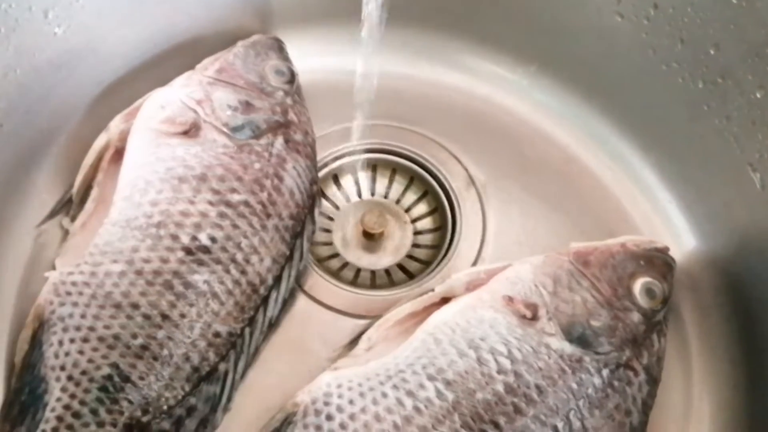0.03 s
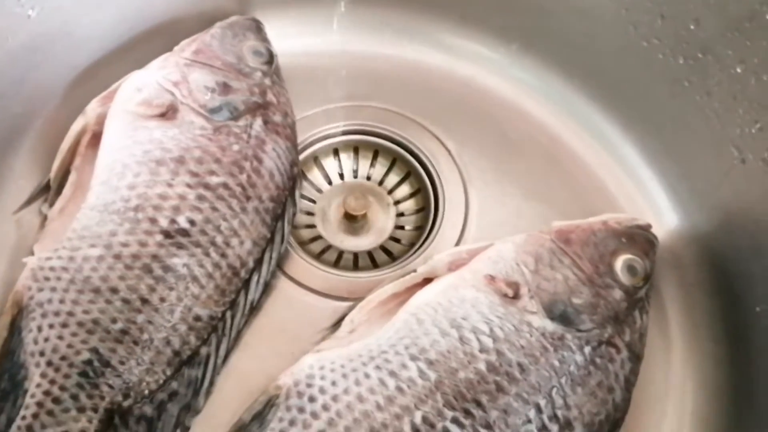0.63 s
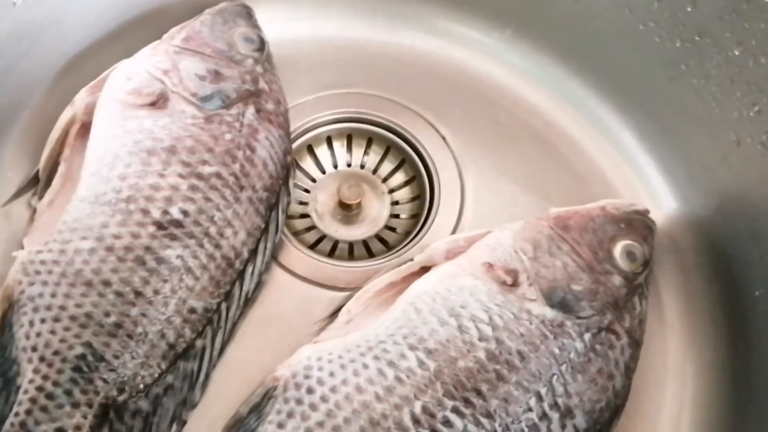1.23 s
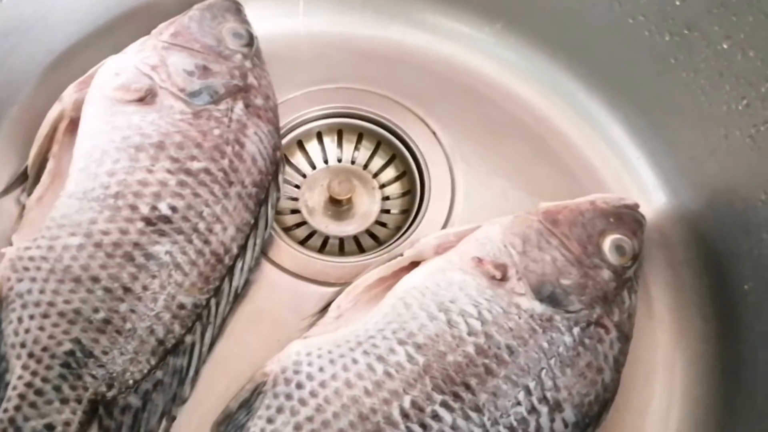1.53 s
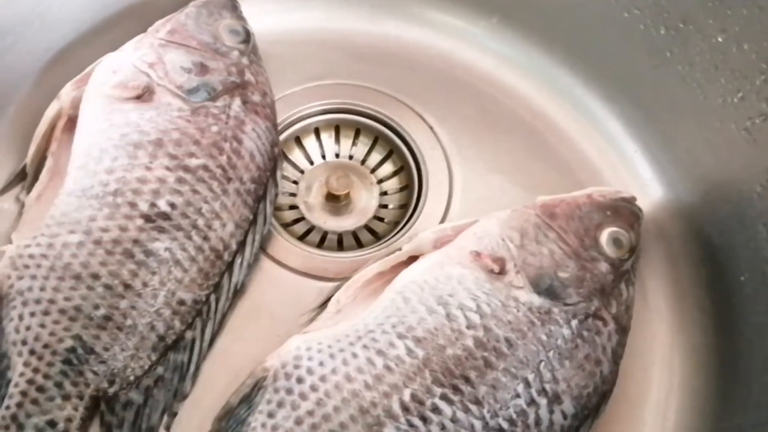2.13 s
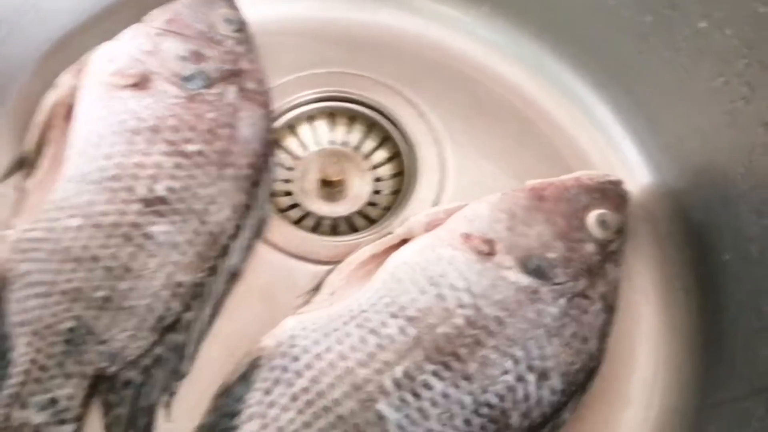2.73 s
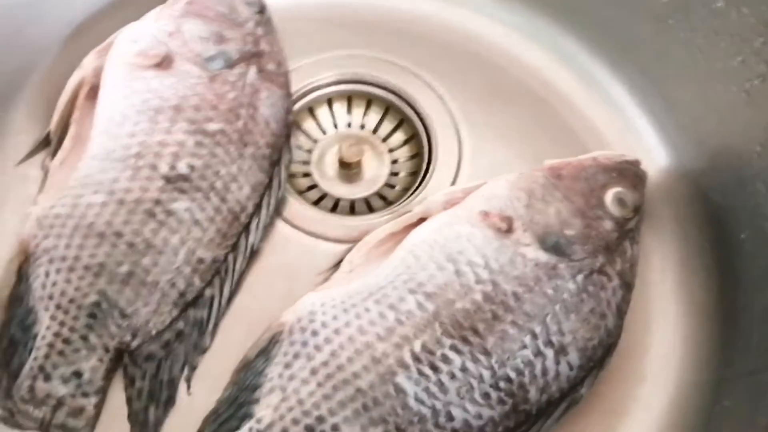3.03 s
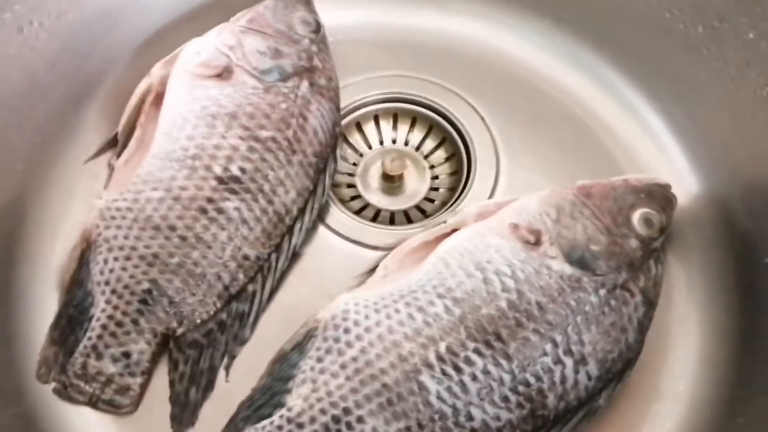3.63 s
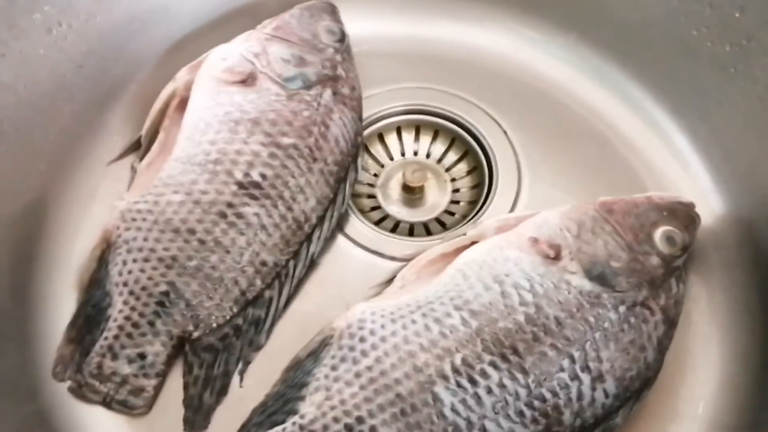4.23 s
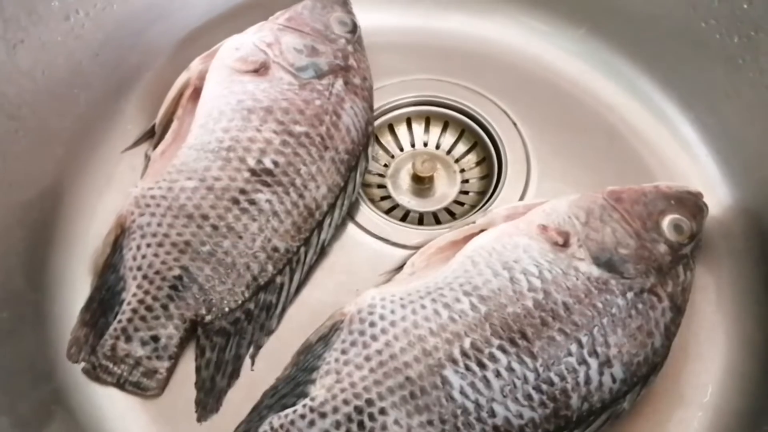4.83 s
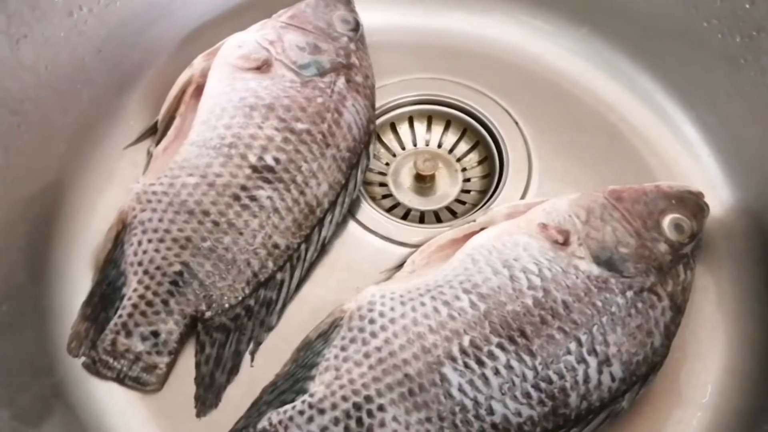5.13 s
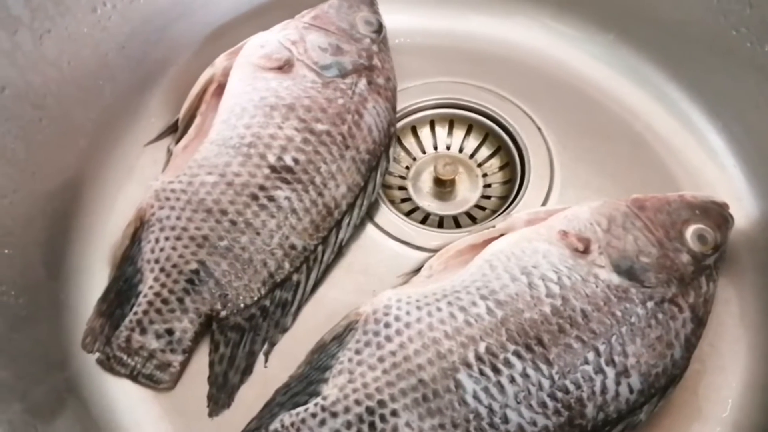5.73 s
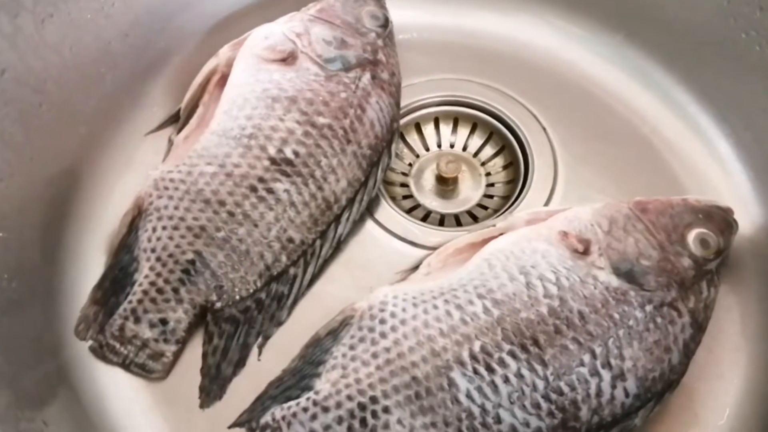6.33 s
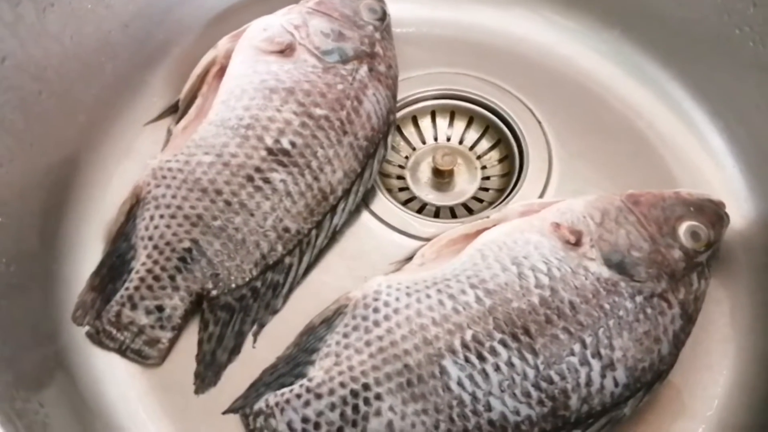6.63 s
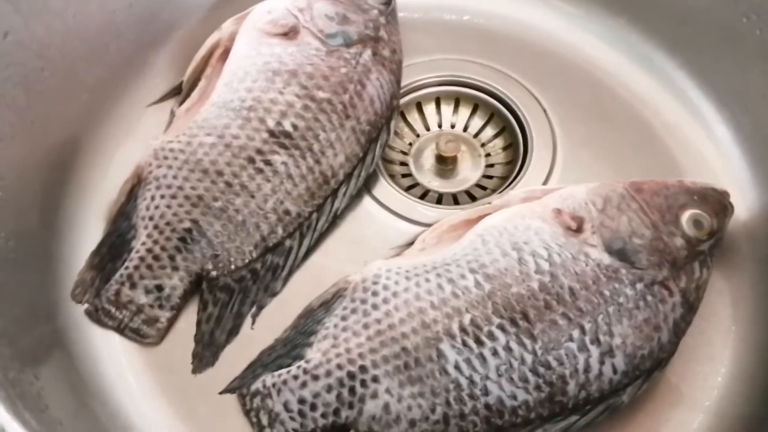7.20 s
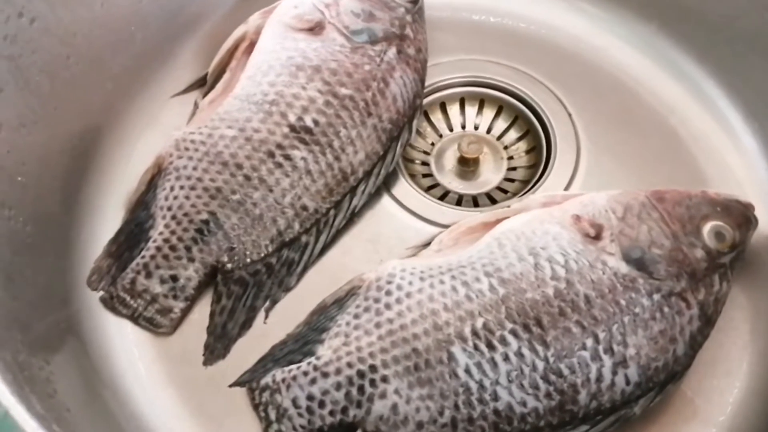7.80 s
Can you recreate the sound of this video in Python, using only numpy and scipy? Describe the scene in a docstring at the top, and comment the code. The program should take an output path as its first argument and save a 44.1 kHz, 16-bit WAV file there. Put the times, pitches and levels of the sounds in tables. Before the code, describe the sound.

A thin stream from a tap splatters on a steel kitchen sink and dies away after about a second. The remaining water then goes down the drain with quick, hollow gulps that ring in the waste pipe, while tiny bubbles fizz and ping at the strainer. The gurgling gradually thins into separate pops and drips. It is heard very close to the drain, with a slight kitchen echo and a faint electrical hum.

```python
"""Last water down the kitchen sink

Close on a steel sink, two microphones at the drain. The tap is shut off and its stream dies on the steel.
As the last water runs out, air gulps through it and rings the waste pipe, while small bubbles ping and
burst at the strainer slots. The gurgle thins to drips; basin and kitchen echo over a faint mains hum."""
import sys
import numpy as np
from scipy import signal
from scipy.fft import rfft, irfft
from scipy.io import wavfile

SR = 44100
rng = np.random.default_rng(int(sys.argv[2]) if len(sys.argv) > 2 else 0)


def transcribe(signal):
    """Save signal, clipped to [-1, 1], as a 16-bit WAV file at the path in sys.argv[1]."""
    frames = np.atleast_2d(signal).T
    limited = np.clip(frames, -1, 1)
    pcm = np.round(limited * 32767).astype(np.int16)
    wavfile.write(sys.argv[1], SR, pcm)


N = 351036

# kitchen reverberation: (frequency [Hz], t60 [s])
KITCHEN_DECAY = [(200, 0.15), (700, 0.31), (1800, 0.24), (5000, 0.21), (12000, 0.044)]
# reflections inside the steel basin: (frequency [Hz], t60 [s])
BASIN_DECAY = [(300, 0.021), (8000, 0.0093)]
# the drain at the two microphones: (frequency [Hz], left minus right [dB], left lead [rad])
MIC_PAIR = [(186, -3, 0), (304, 1, 0.94), (515, 1.5, -0.15), (800, -3, 1.15), (1007, -5.5, 1.58),
            (1340, -6.5, 2), (1430, -14, 1.33), (2150, -12.5, 3), (2917, 1.5, 2.5), (4260, -21, -1.5),
            (4300, -3, -1.5), (5720, -14.5, -1.52), (8260, 20, -1.1), (11100, 7, -1.65), (15000, -6, -2)]
# air resonances of the waste pipe: (frequency [Hz], gain [dB], t60 [s])
PIPE_MODES = [(197.2, 6.5, 0.2), (279.2, 1, 0.24), (352.3, -5, 0.25), (672, -5, 0.071), (1067, -3.5, 0.22),
              (1262, -6, 0.046), (1543, 2.5, 0.031), (3138, -1.5, 0.026)]
# room tone: (frequency [Hz], gain [dB])
ROOM_SPECTRUM = [(20, -12.5), (88, 9), (150, -7.5), (250, -11.5), (380, -8), (800, -17), (1100, -34),
                 (1800, -25.5), (3200, -28.5), (4000, -31), (5800, -25.5), (7500, -32), (15500, -33)]
# mains hum: (frequency [Hz], level [dB])
HUM_TONES = [(67, -84), (100, -68), (196, -77)]
# water rumbling down in the waste pipe: (time [s], level [dB])
RUMBLE_LEVEL = [(0, -51), (0.4, -52), (1.1, -57), (1.6, -58.5), (2.2, -55.5), (4.2, -50), (5.5, -59),
                (7.96, -82)]
# that rumble's tone: (frequency [Hz], gain [dB])
RUMBLE_SPECTRUM = [(55, -37), (82, -13.5), (100, 7.5), (118, -10.5), (150, -16), (195, -9), (250, -31.5)]
# the tap's dying jet: (time [s], level [dB])
JET_LEVEL = [(0, -49), (.1, -51.5), (.2, -59.5), (.4, -57.5), (.52, -57.5), (.555, -53), (.64, -59),
             (.75, -57.5), (1, -64), (1.25, -55)]
# the jet on the steel: (frequency [Hz], gain [dB])
JET_SPECTRUM = [(160, -17), (270, 6), (480, -7.5), (800, -3), (1150, -9.5), (1550, -4.5), (2400, -10.5),
                (3200, -2), (4000, -17), (5700, -9.5), (9000, -8.5), (15500, -40)]
# the jet's fine spray: (frequency [Hz], gain [dB])
SPRAY_SPECTRUM = [(5000, 7), (8000, -2), (15500, -6)]
# the stream spurting into the puddle: (time [s], level [dB])
SPURT_LEVEL = [(0, -67), (.085, -46), (.13, -71), (.5, -67.5), (.55, -58), (.64, -60.5), (.75, -67),
               (1.1, -74)]
# the trickle between gulps: (time [s], churn level [dB], fizz level [dB])
TRICKLE_LEVELS = [(1.1, -57.5, -61), (2.04, -52.5, -53.5), (2.49, -52, -52.5), (2.96, -48, -48.5),
                  (3.27, -54.5, -51.5), (3.75, -55, -56.5), (4.05, -51.5, -54.5), (4.85, -55, -58),
                  (5.15, -59.5, -59), (5.5, -52, -62), (5.99, -64.5, -57.5), (6.29, -70, -60.5),
                  (6.6, -67.5, -60), (7.6, -72, -67)]
# water churning in the pipe: (frequency [Hz], gain [dB])
CHURN_SPECTRUM = [(140, -18.5), (194, -1), (243, -13.5), (355, 1), (520, -8), (680, -20), (880, -23),
                  (1075, -5), (1200, -34), (1530, -14), (1720, -29), (2000, -22), (2450, -21)]
# fizz at the slots: (frequency [Hz], gain [dB])
FIZZ_SPECTRUM = [(2400, -24), (2800, -5), (3150, -7.5), (4000, -27.5), (5150, -7.5), (5900, 4), (7100, -30),
                 (8300, -13), (10500, -21), (11700, -13.5), (13000, -22), (15200, -14)]
# crackling foam: (frequency [Hz], gain [dB])
FROTH_SPECTRUM = [(2500, -11), (2900, 0.5), (3500, 2), (4050, -7.5), (4500, -7.5), (5150, 1.5),
                  (5500, -3.5), (5850, -5.5), (6400, -7.5), (7100, -24), (8200, 1), (9200, -12),
                  (15000, -18)]
# drops landing on bare steel: (time [s], level [dB])
STEEL_DROPS = [(0.137, -38), (0.153, -34.5), (0.27, -41), (0.305, -48), (0.354, -40), (0.424, -36.5),
               (0.461, -45), (0.659, -41.5), (0.805, -51), (0.939, -49.5), (1.181, -39), (1.217, -42.5),
               (4.053, -39), (4.145, -43.5), (4.336, -58), (4.776, -39), (4.866, -50), (6.8912, -29.5)]
# their spray: (frequency [Hz], gain [dB])
SPLAT_SPECTRUM = [(6000, 4.5), (9500, 5), (11700, 5), (13500, -11), (14800, 1), (15700, -22)]
# large bubbles surfacing: (time [s], length [s], start pitch [Hz], end pitch [Hz], level [dB])
LARGE_BUBBLES = [(0.895, 0.04, 175, 208, -55.5), (1.122, 0.051, 175, 224, -54),
                 (1.233, 0.029, 248, 252, -52), (1.313, 0.022, 271, 282, -41),
                 (1.38, 0.029, 308, 280, -37.5), (1.454, 0.026, 329, 273, -46),
                 (1.497, 0.039, 300, 342, -44.5), (1.657, 0.052, 356, 342, -45),
                 (1.927, 0.073, 348, 369, -35.5), (2.069, 0.1, 365, 344, -42.5),
                 (2.187, 0.026, 365, 362, -33.5), (2.546, 0.071, 350, 339, -39),
                 (2.943, 0.08, 345.4, 364, -51), (2.981, 0.041, 360, 350, -42),
                 (3.997, 0.025, 930, 1390, -44.5), (4.033, 0.0212, 1115, 1680, -40),
                 (4.338, 0.018, 1170, 1570, -47), (4.459, 0.022, 1310, 1830, -44.5),
                 (4.562, 0.024, 1770, 1360, -48.5), (4.59, 0.021, 1073, 1160, -38),
                 (5.729, 0.026, 1290, 1600, -65)]
# loud drops and small bubbles round the strainer: (time [s], pitch [Hz], ring level [dB], burst level [dB])
LOUD_PINGS = [(0.011, 1502, -52, -51.5), (0.076, 865, -51, -44), (0.092, 1520, -57, -44.5),
              (0.136, 5940, -42, -44.5), (0.153, 5800, -39.5, -45), (0.267, 8450, -48, -51),
              (0.353, 6800, -43, -49), (0.424, 5680, -60, -53), (0.497, 5670, -50.5, -55),
              (0.549, 1554, -54, -58), (0.563, 833, -54.5, -55), (0.613, 5254, -51, -60),
              (0.804, 6370, -58, -52), (0.863, 5750, -44.5, -76), (1.096, 3430, -53.5, -59),
              (1.216, 3350, -58, -52), (1.781, 5040, -49, -50.5), (1.849, 5040, -48, -55),
              (1.919, 4900, -51, -55), (1.995, 5740, -47, -56), (2.037, 5770, -46.5, -77),
              (2.095, 5470, -41.5, -63), (2.136, 5800, -43, -49), (2.253, 5660, -56, -62),
              (2.348, 4480, -50, -52), (2.411, 5870, -37.5, -57), (2.445, 5730, -45, -50.5),
              (2.508, 5100, -45, -46.5), (2.562, 5330, -50, -54), (2.741, 5850, -50, -53),
              (2.866, 5570, -43.5, -44.5), (3.013, 3180, -46.5, -63), (3.066, 5150, -46, -47),
              (3.172, 5160, -46, -66), (3.276, 4920, -41.5, -49), (3.329, 3060, -46.5, -54),
              (3.366, 3080, -53, -47), (3.38, 3116, -42, -60), (3.533, 5130, -40.5, -51.5),
              (3.698, 3236, -46, -51.5), (3.872, 5350, -48, -71.5), (3.996, 5090, -42.5, -60),
              (4.054, 5670, -41.5, -46), (4.199, 3165, -48.5, -45), (4.279, 3200, -39.5, -41.5),
              (4.338, 6100, -47, -75), (4.489, 3090, -48, -78), (4.619, 3040, -44.5, -57),
              (4.664, 3175, -41.5, -44), (4.776, 3275, -46, -55), (4.83, 3210, -47, -54),
              (4.866, 5960, -48, -49), (4.925, 4540, -44.5, -54), (5.036, 8930, -56, -52),
              (5.195, 3230, -43, -60), (5.408, 3250, -47, -59), (5.436, 3210, -47.5, -77.5),
              (5.492, 3150, -53.5, -58), (5.521, 8870, -44.5, -54), (5.668, 3234, -45, -58),
              (5.887, 3250, -53, -69), (5.951, 3170, -47, -64), (6.107, 5090, -48, -48),
              (6.307, 3160, -54.5, -51.5), (6.49, 4820, -42, -56), (6.533, 8990, -54, -42.5),
              (6.568, 6180, -48, -39.5), (6.601, 3170, -48, -52), (6.705, 8470, -55, -58),
              (6.763, 3230, -57.5, -55.5), (6.827, 5100, -53, -55.5), (6.892, 9400, -41.5, -52),
              (6.985, 4600, -49, -52), (7.182, 3210, -53.5, -55.5), (7.215, 8270, -51, -63),
              (7.239, 5870, -60, -42), (7.279, 5590, -54, -45.5), (7.343, 6650, -50, -56),
              (7.382, 3210, -55, -54), (7.522, 3310, -49, -67), (7.669, 8740, -54, -49.5),
              (7.719, 6120, -37.5, -65), (7.778, 3260, -52.5, -51), (7.859, 8260, -46.5, -56),
              (7.891, 3200, -53, -51.5)]
# notes of the bubble sizes the strainer favours: (pitch [Hz])
SLOT_NOTES = [3255, 5220, 8640]
# a small bubble bursting: (frequency [Hz], gain [dB])
BURST_SPECTRUM = [(1200, -14), (2500, -9), (3200, -0.5), (4000, -3), (5200, 4.5), (6000, 10.5),
                  (7200, -10.5), (8600, 5.5), (10300, -9.5), (11700, -12), (13200, -25), (15500, -10)]
# loud air gulps in the drain: (time [s], low ring level [dB], pop pitch [Hz], pop level [dB])
LOUD_GULPS = [(1.315, -45, 1020, -49.5), (1.368, -41.5, 1050, -52.5), (1.575, -48.5, 1045, -54.5),
              (1.681, -52, 1020, -54), (1.752, -54, 1070, -54), (1.782, -43, 1087, -46.5),
              (1.921, -41.5, 1060, -43.5), (1.962, -37, 1080, -43), (2.017, -37, 1084, -47),
              (2.059, -33.5, 1060, -52), (2.077, -34, 1068, -48), (2.161, -34.5, 1096, -40.5),
              (2.201, -39.5, 1130, -52), (2.346, -52, 1054, -53), (2.364, -50, 1048, -41.5),
              (2.394, -44, 1044, -48), (2.447, -54, 1040, -70), (2.477, -39.5, 1086, -49),
              (2.528, -33.5, 1099, -34.5), (2.564, -44, 990, -50), (2.61, -44, 1030, -49),
              (2.702, -42.5, 1050, -42), (2.768, -45.5, 1040, -41.5), (2.787, -45.5, 1060, -55),
              (2.887, -43, 1000, -63), (2.926, -37, 1070, -69), (2.965, -41, 1020, -47),
              (3.014, -53, 1060, -42.5), (3.048, -45, 1095, -47), (3.096, -46, 1070, -46),
              (3.112, -43, 1050, -44.5), (3.17, -36, 1072, -36), (3.229, -57, 1070, -48),
              (3.425, -49.5, 1083, -41), (3.475, -39.5, 1083, -38), (3.698, -36.5, 1050, -54),
              (3.834, -44.5, 1083, -46), (3.947, -49, 1040, -72), (3.996, -44.5, 1073, -57),
              (4.027, -42.5, 1084, -62), (4.111, -41.5, 1040, -64), (4.038, -43.5, 1314, -58),
              (4.165, -47.5, 1224, -38.5), (4.241, -37.5, 1010, -41), (4.253, -43.5, 1205, -56),
              (4.277, -65, 2130, -44), (4.397, -35.5, 1080, -39), (4.413, -44, 1200, -57),
              (4.443, -48, 1046, -37.5), (4.464, -59, 1073, -38), (4.513, -43, 1050, -47),
              (4.536, -40.5, 1036, -44), (4.59, -46, 1114, -42), (4.686, -61, 1140, -46),
              (4.716, -52, 1207, -44), (4.775, -52, 1140, -51), (4.829, -44.5, 1090, -54),
              (4.871, -51, 1100, -57), (4.903, -43.5, 1044, -67), (4.925, -44, 1205, -44.5),
              (4.97, -40.5, 1057, -45), (5.014, -50, 1067, -54), (5.065, -66, 1077, -55.5),
              (5.166, -56, 910, -56), (5.238, -39.5, 1310, -45.5), (5.262, -46, 1100, -59),
              (5.312, -47.5, 1030, -48.5), (5.401, -36, 1064, -40.5), (5.426, -44.5, 1070, -48),
              (5.522, -44.5, 1080, -34), (5.597, -50, 1070, -52), (5.612, -46, 1600, -57.5),
              (5.666, -59, 1315, -49.5), (5.725, -45, 1470, -48), (5.808, -48.5, 1970, -53),
              (5.951, -41.5, 1020, -45), (6.222, -44.5, 1786, -47), (6.305, -55, 2116, -50.5),
              (6.51, -55.5, 1050, -61), (6.523, -49, 1290, -55), (6.568, -49, 2030, -41),
              (6.602, -50.5, 1120, -60), (6.704, -41, 1168, -41.5), (6.892, -58.5, 1030, -53.5),
              (7.181, -51, 1110, -63), (7.239, -47.5, 1090, -50), (7.277, -52.5, 1330, -62),
              (7.381, -51, 1090, -57.5), (7.67, -53, 1094, -52.5), (7.777, -54, 2145, -56)]
# a gulp's thump: (frequency [Hz], gain [dB])
THUMP_SPECTRUM = [(90, -32.5), (190, -8.5), (245, -27), (350, -7.5), (480, -1.5), (700, -5), (880, -13.5),
                  (1300, -45.5)]
# a gulp's pop: (frequency [Hz], gain [dB])
POP_SPECTRUM = [(500, -18.5), (850, -8), (1080, 2.5), (1300, -1.5), (1550, -6), (1720, -14.5), (1900, 1.5),
                (2100, 4), (2350, -41), (3000, -4.5)]

UNCOVER_S = 1.1  # air first breaks through the drain
LEVEL_SPAN_S = 0.015  # time over which a short sound's loudness is averaged
EDGE_HZ = 15900  # top of the recorder's band
TIME, FREQS = np.arange(N) / SR, np.fft.rfftfreq(N, 1 / SR)
AGE = TIME[:SR // 8]  # time within one short sound


def amp(db):
    """Decibels to gain."""
    return 10 ** (np.asarray(db) / 20)


def decay(t, t60):
    """A fall of 60 dB every t60 seconds."""
    return np.exp(-np.log(1000) * t / t60)


def unit_rms(x):
    """Scales to rms 1."""
    return x / np.sqrt(np.mean(abs(x) ** 2) + 1e-20)


def unit_level(x):
    """Scales a short sound to the energy of rms 1 held for LEVEL_SPAN_S."""
    return x / np.sqrt(np.sum(x ** 2) / (LEVEL_SPAN_S * SR) + 1e-20)


def at_hz(table, hz, column=1):
    """Reads a spectrum table on a log-frequency axis."""
    columns = np.transpose(table)
    return np.interp(np.log(hz + 1), np.log(columns[0] + 1), columns[column])


def at_time(table, s, column=1):
    """Reads a time curve."""
    columns = np.transpose(table)
    return np.interp(s, columns[0], columns[column])


def add(mix, s, sound):
    """Mixes a sound in at time s."""
    part = mix[max(round(s * SR), 0):][:len(sound)]
    part += sound[:len(part)]


def colour(x, spectrum):
    """Causal filter with the given spectrum; white noise keeps its power."""
    hz = abs(np.fft.fftfreq(8192, 1 / SR))
    octaves_below = np.maximum(np.log2(spectrum[0][0] / (hz + 1)), 0)
    octaves_above = np.maximum(np.log2((hz + 1) / spectrum[-1][0]), 0)
    gain = amp(np.maximum(at_hz(spectrum, hz) - 30 * (octaves_below + octaves_above), -90))
    taps = np.fft.ifft(np.exp(np.conj(signal.hilbert(np.log(gain))))).real[:len(hz) // 2]
    return signal.oaconvolve(x, taps / np.linalg.norm(taps))[:len(x)]


def drift(rate_hz):
    """A slow random wander of rms 1."""
    return unit_rms(irfft(rfft(rng.standard_normal(N)) / (1 + (FREQS / rate_hz) ** 4), N))


def ragged(samples, lump_db, lump_hz):
    """An uneven gain: water moves in fits and starts."""
    knots = np.clip(rng.standard_normal(256), -2, 2)
    return amp(lump_db * np.interp(np.arange(samples) / SR * lump_hz, np.arange(len(knots)), knots))


def clicks(per_s, spread_db):
    """Random clicks, most small and a few large."""
    size = amp(spread_db * np.minimum(rng.exponential(1, N), 4)) * rng.choice([-1, 1], N)
    return unit_rms(size * (rng.random(N) < per_s / SR))


def background(room_db=-61, apart_db=-5, rumble_db=-2, waver_rad=0.83):
    """Behind the water: room tone, a wavering mains hum and the rumble of the waste pipe."""
    common, left, right = (unit_rms(colour(rng.standard_normal(N), ROOM_SPECTRUM)) for _ in range(3))
    air = amp(room_db) * (common + amp(apart_db) * np.array([left, right]))
    hum = sum(amp(db) * np.sqrt(2) * np.sin(2 * np.pi * hz * TIME + waver_rad * drift(rate_hz=9.3))
              for hz, db in HUM_TONES)
    rumble = colour(rng.standard_normal(N), RUMBLE_SPECTRUM)
    return air + hum + amp(at_time(RUMBLE_LEVEL, TIME) + rumble_db) * rumble


def echoes(x, t60_table, delay_s, alike_hz=800):
    """Dense reflections, each band dying at its own speed; long waves reach both microphones alike."""
    hz, t, (left, other) = signal.stft(rng.standard_normal((2, SR // 2)), SR, nperseg=128)
    alike = 1 / (1 + (hz[:, None] / alike_hz) ** 4)
    right = alike * left + np.sqrt(1 - alike ** 2) * other
    tail = signal.istft(np.array([left, right]) * decay(t, at_hz(t60_table, hz)[:, None]), SR)[1]
    tail = np.pad(tail / np.linalg.norm(tail[0]), ((0, 0), (int(delay_s * SR), 0)))
    return signal.fftconvolve(x, tail, axes=1)[:, :N]


def microphones(x):
    """Sound from the drain reaches each microphone with its own level and phase."""
    tilt, lead = amp(at_hz(MIC_PAIR, FREQS)), at_hz(MIC_PAIR, FREQS, column=2)
    pair = np.array([tilt * np.exp(.5j * lead), np.exp(-.5j * lead)]) * np.sqrt(2 / (1 + tilt ** 2))
    return irfft(rfft(x) * pair, N)


def pipe(x):
    """Under the sink, air in the waste pipe keeps sounding at its own resonances."""
    out = np.zeros(N)
    for hz, db, t60 in PIPE_MODES:
        radius = decay(1 / SR, t60)
        pole = radius * np.exp(2j * np.pi * hz / SR)
        out += 2 * amp(db) * signal.lfilter([1 - radius], [1, -pole], x).real
    return out


def ring(hz, t60, rise_s, glide):
    """A bubble's dying tone; a positive glide lifts its pitch as it nears the surface."""
    pitch = hz * (1 + glide * (np.tanh(AGE / LEVEL_SPAN_S) - 1 / 3))
    tone = np.sin(2 * np.pi * np.cumsum(pitch) / SR)
    return unit_level(tone * (1 - np.exp(-AGE / rise_s)) * decay(AGE, t60))


def burst(t60):
    """A film of water breaks: a brief crack of noise."""
    return unit_level(rng.standard_normal(len(AGE)) * decay(AGE, t60))


def tear(t60):
    """A film of water gives way in a cluster of wet ticks."""
    return unit_level(burst(t60) * ragged(len(AGE), lump_db=5, lump_hz=450) * np.tanh(AGE / 0.00077))


def splash(hz, t60, scatter_s, spectrum=None):
    """One drop breaks into a cluster of tiny bubbles, each starting a moment apart."""
    late, phase, size = rng.random((3, len(hz), 1))
    weight = 1 if spectrum is None else amp(at_hz(spectrum, hz))[:, None]
    age = np.maximum(AGE[:len(AGE) // 3] - scatter_s * late ** 2, 0)
    envelope = (1 - np.exp(-age / .0002)) * decay(age, t60)
    tones = np.sin(2 * np.pi * (hz[:, None] * age + phase))
    return unit_level(np.sum(weight * (0.027 + size) * envelope * tones, 0))


def strew(shapes, per_s, spread_db, size_floor, tries=3000):
    """Short sounds at random moments, most faint; size_floor limits the strongest."""
    out = np.zeros(N)
    for when, size, chance, kind in rng.random((tries, 4)):
        if chance < per_s * N / SR / tries:
            gain = amp(-spread_db * np.log(size_floor + size))
            add(out, when * N / SR, gain * shapes[int(kind * len(shapes))])
    return out


def spatter(lo_hz, hi_hz, per_s, t60, spread_db=6):
    """Many small splashes at random moments."""
    shapes = [splash(np.exp(rng.uniform(np.log(lo_hz), np.log(hi_hz), size=7)), t60, scatter_s=.003)
              for _ in range(20)]
    return unit_rms(strew(shapes, per_s, spread_db, size_floor=0.013))


def bubbles(lo_hz, hi_hz, per_s, t60, spread_db=6, sizes=30, tries=200):
    """A swarm of bubbles, each size ringing at its own pitch."""
    out = np.zeros(N)
    for hz in np.geomspace(lo_hz, hi_hz, sizes):
        tone = ring(hz * rng.uniform(1.0, 1.03), t60, rise_s=0.00034, glide=0.02)
        for when, size, chance in rng.random((tries, 3)):
            if chance < per_s * N / SR / sizes / tries:
                add(out, when * N / SR, amp(-spread_db * np.log(0.027 + size)) * tone)
    return unit_rms(out)


def wet_ticks(per_s, spread_db, t60):
    """Films of water tear at random moments."""
    return signal.oaconvolve(clicks(per_s, spread_db), tear(t60))[:N]


def jet(spatter_db=-2, tick_db=-5, bubble_db=-7, hiss_db=-13, spray_db=-55.5, spray_s=0.31):
    """The tap's thinning stream breaks into drops that splatter on the steel; its spray dies first."""
    ticks = sum(wet_ticks(per_s=54, spread_db=6.5, t60=0.018) for _ in range(3))
    swarm = bubbles(201, 2386, per_s=600, t60=0.075, spread_db=7)
    centre = amp(tick_db) * unit_rms(colour(ticks, JET_SPECTRUM))
    centre += amp(bubble_db) * unit_rms(colour(swarm, JET_SPECTRUM))
    sides = [amp(spatter_db) * unit_rms(colour(spatter(927, 14900, per_s=330, t60=0.015), JET_SPECTRUM))
             + amp(hiss_db) * colour(rng.standard_normal(N), JET_SPECTRUM) for _ in range(2)]
    spray = [unit_rms(colour(wet_ticks(per_s=300, spread_db=5.5, t60=0.0053), SPRAY_SPECTRUM))
             for _ in range(2)]
    flow = amp(at_time(JET_LEVEL, TIME)) * np.clip((1.3 - TIME) / 0.25, 0, 1)
    spray_fade = amp(spray_db) * np.exp(-(TIME / spray_s) ** 2 / 2)
    return flow * (np.array(sides) + centre) + spray_fade * np.array(spray)


def spurts(gain_db=-1):
    """The stream plunges into the puddle and churns it into bubbles."""
    foam = spatter(642, 1820, per_s=140, t60=0.061)
    return amp(gain_db + at_time(SPURT_LEVEL, TIME)) * np.clip((1.3 - TIME) / .2, 0, 1) * foam


def openness(s, start=0.15, end=0.67, sinks_from_s=1.94, sinking_s=3.1):
    """The share of the drain laid bare as the water sinks, ever more slowly."""
    sunk = 1 - np.exp(-np.maximum(s - sinks_from_s, 0) / sinking_s)
    return start + (end - start) * sunk


def froth(centre_hz=5350, clump_db=3):
    """Foam bursts in clumps; each bubble is a short ring, a wet tick and a few companions."""
    shapes = []
    for hz in centre_hz * np.exp(0.0977 * np.clip(rng.standard_normal(30), -2, 2)):
        near_hz = hz * np.exp(0.27 * rng.standard_normal(5))
        shape = ring(hz, t60=0.028, rise_s=0.00081, glide=0.049 * rng.random()) + 0.74 * tear(t60=0.013)
        add(shape, 0, splash(near_hz, t60=0.038, scatter_s=.008))
        shapes.append(shape)
    foam = strew(shapes, per_s=250, spread_db=4, size_floor=0.0078)
    return unit_rms(colour(foam * amp(clump_db * drift(rate_hz=17)), FROTH_SPECTRUM))


def trickle(knock_db=-2, burble_db=-3, froth_db=4, swarm_db=-4, crackle_db=-1, sizzle_db=-6):
    """Water churns in the pipe. Froth covers the strainer at first; bared slots burble and fizz."""
    opened = openness(TIME)
    knocks = unit_rms(colour(clicks(per_s=160, spread_db=6), CHURN_SPECTRUM))
    burble = unit_rms(colour(bubbles(999.5, 1951, per_s=90, t60=0.066), POP_SPECTRUM))
    churn = amp(knock_db) * knocks + amp(burble_db) * np.sqrt(opened) * burble
    swarm = unit_rms(colour(bubbles(2900, 12000, per_s=300, t60=0.02), FIZZ_SPECTRUM))
    crackle = unit_rms(colour(spatter(2632, 14430, per_s=150, t60=0.027), FIZZ_SPECTRUM))
    sizzle = spatter(7900, 12140, per_s=82, t60=0.03, spread_db=9.5)
    spitting = np.exp(-((opened - .42) / 0.031) ** 2)  # half-bared slots spit the most
    fizz = (amp(froth_db) * (1 - opened) ** 2 * froth() + amp(crackle_db) * np.sqrt(opened) * crackle
            + amp(swarm_db) * opened * swarm + amp(sizzle_db) * spitting * sizzle)
    churn *= amp(at_time(TRICKLE_LEVELS, TIME))
    fizz *= amp(at_time(TRICKLE_LEVELS, TIME, column=2))
    return np.clip((TIME - 1.05) / 0.3, 0, 1) * (churn + fizz)


def splats(hit_db=-11, tail_db=-19):
    """A drop smacks the steel and its spray hisses down around it."""
    hiss = np.zeros(N)
    for s, db in STEEL_DROPS:
        add(hiss, s, amp(db) * (amp(hit_db) * burst(t60=0.03) + amp(tail_db) * burst(t60=0.31)))
    return colour(hiss, SPLAT_SPECTRUM)


def bloops(cycles_per_lump=3.37):
    """A large bubble's note swells, wobbles and slides until it breaks the surface."""
    out = np.zeros(N)
    for s, length, start_hz, end_hz, db in LARGE_BUBBLES:
        progress = np.linspace(0, 1, int(length * SR))
        pitch = start_hz * (end_hz / start_hz) ** progress
        tone = np.sin(2 * np.pi * np.cumsum(pitch) / SR)
        wobble = ragged(len(tone), lump_db=4, lump_hz=start_hz / cycles_per_lump)
        add(out, s, amp(db) * unit_level(tone * wobble * np.sqrt(progress) * (1 - progress)))
    return out


def ebbing_moments(per_s, thinning, full_flow_db=-48, swell_s=0.19, swell_db=20, tries=240):
    """Moments that thin out as the flow ebbs: (time [s], relative flow [dB], three random deviates)."""
    step_s = (N / SR - UNCOVER_S) / tries
    late, chance = rng.random((tries, 2)).T
    s = UNCOVER_S + step_s * (np.arange(tries) + late)
    ebb_db = at_time(TRICKLE_LEVELS, s) - full_flow_db
    held_back_db = swell_db * np.maximum(1 - (s - UNCOVER_S) / swell_s, 0)
    deviates = np.clip(rng.standard_normal((tries, 3)), -1.5, 1.5)
    rows = np.column_stack([s, ebb_db - held_back_db, deviates])
    return rows[chance < per_s * step_s * amp(thinning * ebb_db)]


def faint_pings(ring_db=-46, burst_db=-50, spread_db=2, smaller_db=-2):
    """Rows like LOUD_PINGS for faint bubbles at the bared slots; the smaller ones ring more weakly."""
    rows = []
    for k, (s, flow_db, ring_dev, burst_dev, pitch_dev) in enumerate(ebbing_moments(12, thinning=.3)):
        slot = k % len(SLOT_NOTES)
        strength_db = 0.37 * flow_db + 20 * np.log10(openness(s))
        hz = SLOT_NOTES[slot] * np.exp(0.027 * pitch_dev)
        ring_level = ring_db + smaller_db * slot + strength_db + spread_db * ring_dev
        rows.append((s, hz, ring_level, burst_db + strength_db + spread_db * burst_dev))
    return rows


def pings(ring_db=1, crack_db=-3, companions=0.33):
    """Drops and small bubbles ring and burst amid companions; the smallest die soonest."""
    tones, cracks = np.zeros((2, N))
    for s, hz, ring_level, burst_level in list(LOUD_PINGS) + faint_pings():
        length, climb = rng.standard_normal(2)
        t60 = 0.024 * np.exp(0.11 * length) * np.sqrt(4000 / hz)
        note = ring(hz, t60, rise_s=0.00088, glide=0.0042 + 0.042 * climb)
        add(tones, s, amp(ring_level + ring_db) * note)
        near_hz = hz * np.exp(0.1 * rng.standard_normal(4))
        add(tones, s, companions * amp(ring_level) * splash(near_hz, t60=0.0073, scatter_s=0.017))
        wide_hz = np.clip(np.sqrt(hz * 7500) * np.exp(0.54 * rng.standard_normal(18)), 1000, EDGE_HZ)
        cluster = splash(wide_hz, t60=0.055, scatter_s=0.0081, spectrum=BURST_SPECTRUM)
        add(tones, s, amp(burst_level) * cluster)
        add(cracks, s, amp(burst_level + crack_db) * (0.64 * tear(t60=0.017) + 0.57 * burst(t60=0.0043)))
    return tones + colour(cracks, BURST_SPECTRUM)


def neck_hz(s, start_hz=180, clear_hz=354.8, clearing_s=0.32, creep_hz_per_s=4.96):
    """The air in the drain's neck climbs quickly in pitch as the neck clears, then creeps on upward."""
    since = max(s - UNCOVER_S, 0)
    return clear_hz + (start_hz - clear_hz) * np.exp(-since / clearing_s) + creep_hz_per_s * since


def faint_gulps(low_db=-48.5, pop_db=-52, pop_hz=1070, spread_db=4, weakening=0.7):
    """Rows like LOUD_GULPS for small gulps; their pops stray upward in pitch as the drain opens."""
    return [(s, low_db + weakening * flow_db + spread_db * low_dev,
             pop_hz * np.exp(0.11 * openness(s) * abs(pitch_dev)),
             pop_db + weakening * flow_db + spread_db * pop_dev)
            for s, flow_db, low_dev, pop_dev, pitch_dev in ebbing_moments(19, thinning=.55)]


def gulps(low_db=2, upper_db=1.04, thump_db=-1.5, cluster_db=-2, pop_db=-5, damping=1.72):
    """Each gulp of air rings two resonances; a more open drain rings shorter and pops harder."""
    tones, thumps, pops = np.zeros((3, N))
    for s, low_level, pop_hz, pop_level in list(LOUD_GULPS) + faint_gulps():
        opened = openness(s)
        low_hz = neck_hz(s) * np.exp(0.012 * rng.standard_normal())
        shorter = np.exp(-damping * opened)
        low = amp(low_level + low_db) * ring(low_hz, 0.11 * shorter, rise_s=0.00056, glide=0.0021)
        upper = amp(pop_level + upper_db) * ring(pop_hz, 0.09 * shorter, rise_s=0.0025, glide=0.0039)
        add(tones, s, np.sqrt(1 - opened / 2) * (low + upper))
        near_hz = 1.2 * pop_hz * np.exp(0.2455 * rng.standard_normal(8))
        cluster = splash(near_hz, t60=0.031, scatter_s=0.00779, spectrum=POP_SPECTRUM)
        add(tones, s, amp(pop_level + cluster_db) * np.sqrt(opened) * cluster)
        add(thumps, s, amp(low_level) * np.sqrt(opened / 2) * tear(t60=0.013))
        add(pops, s, amp(pop_level) * np.sqrt(opened) * tear(t60=0.051))
    return tones + amp(thump_db) * colour(thumps, THUMP_SPECTRUM) + amp(pop_db) * colour(pops, POP_SPECTRUM)


def scene(direct_db=-1.5, basin_db=-12, kitchen_db=-13, into_pipe_db=-2):
    """Drain and stream up close, the pipe below, the steel basin around them, the kitchen beyond."""
    drain = gulps() + bloops() + pings() + splats() + trickle()
    stream = jet() + spurts()
    pipe_ring = pipe(drain + amp(into_pipe_db) * stream.mean(0))
    water = microphones(drain + pipe_ring) + stream
    basin = echoes(water, BASIN_DECAY, delay_s=0.0018)
    kitchen = echoes(0.74 * water + 0.26 * water[::-1], KITCHEN_DECAY, delay_s=0.0073)  # sides mingle
    return amp(direct_db) * water + amp(basin_db) * basin + amp(kitchen_db) * kitchen + background()


def record(dry):
    """The recorder's band limit."""
    lowpass = signal.firwin(511, EDGE_HZ, window=("kaiser", 9), fs=SR)
    return signal.oaconvolve(dry, lowpass[None], "same")


dry = scene()
out = record(dry)
transcribe(out)
```